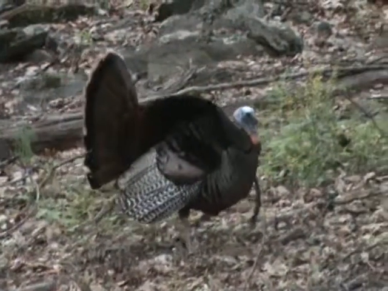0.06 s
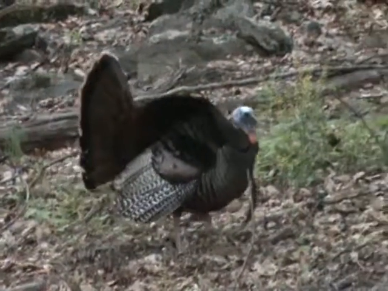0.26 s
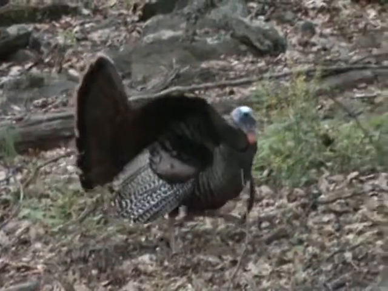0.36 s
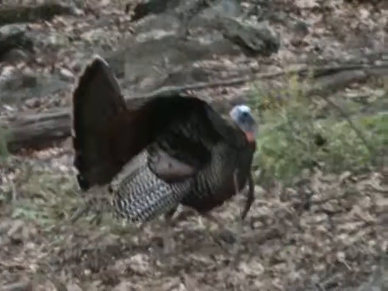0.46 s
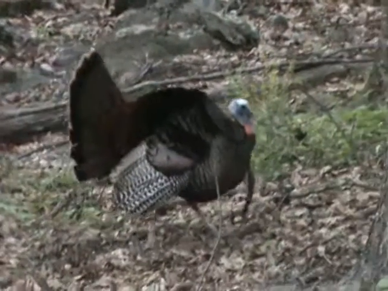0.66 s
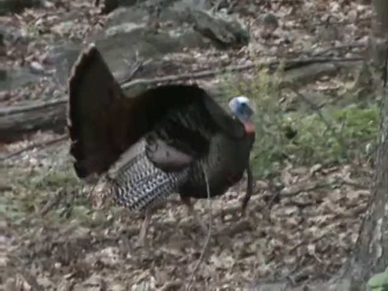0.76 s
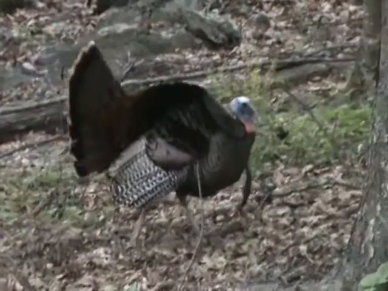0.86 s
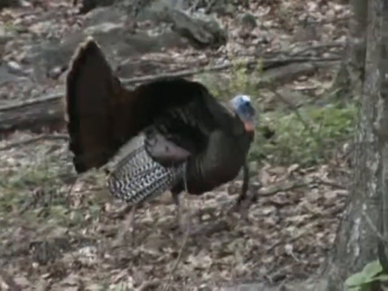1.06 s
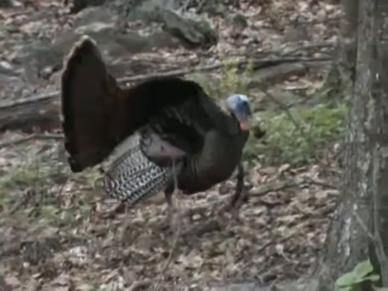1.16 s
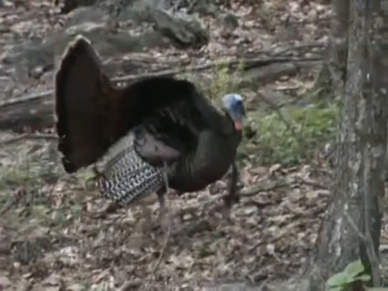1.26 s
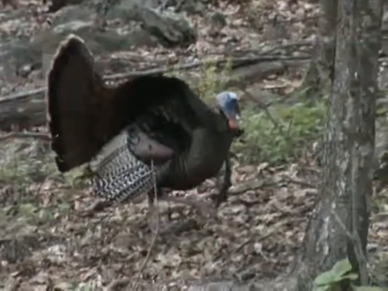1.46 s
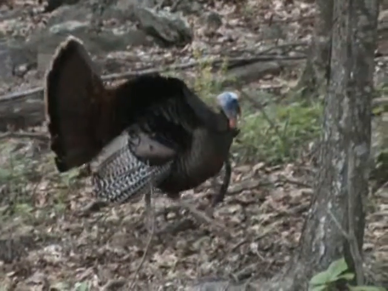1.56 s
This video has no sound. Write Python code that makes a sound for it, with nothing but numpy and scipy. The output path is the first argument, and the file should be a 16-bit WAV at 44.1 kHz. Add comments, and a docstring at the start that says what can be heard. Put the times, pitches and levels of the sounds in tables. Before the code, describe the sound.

Near the microphone, a wild turkey gobbles once, a brief hollow rattle that starts raspy and turns duller. Faint birds keep whistling far off among the trees, with soft leaf rustles, a few tiny stem snaps and steady hiss.

```python
"""A short, low, dry creaking rattle of uneven knocks sounds close by, a little to the left of the
microphone: its pulses ring hollow resonances, raspy at first, then duller and weaker.
Far off in the woodland, songbirds whistle and the trunks scatter their calls into a diffuse tail.
Dry leaves rustle faintly and a few stems snap. Under it all lie a steady rumble and hiss
and the thin, high whine of the electronics."""
import sys
import numpy as np
from scipy import signal
from scipy.fft import rfft, irfft
from scipy.io import wavfile
from scipy.ndimage import uniform_filter1d

SR = 44100
rng = np.random.default_rng(int(sys.argv[2]) if len(sys.argv) > 2 else 0)


def dump_mix(stems):
    """Bounce the given channels to the path in sys.argv[1] as a 16-bit WAV at rate SR."""
    frames = np.atleast_2d(stems).T  # one column per channel
    limited = np.clip(frames, -1, 1)  # hard clip at full scale
    pcm = np.round(limited * 32767).astype(np.int16)
    wavfile.write(sys.argv[1], SR, pcm)


N = 70560

# spectrum of dry leaves and stems: f/Hz, level/dB
LEAF_SPECTRUM = [(1500, -7.5), (3500, 0), (6500, 3.5), (9300, -1.5), (11000, -8.5), (16000, -18.5)]


def undb(db):
    """Decibels to gain."""
    return 10 ** (np.asarray(db) / 20)


def freqs():
    """Frequency of each spectrum bin."""
    return np.arange(N // 2 + 1) * SR / N


def gains(points):
    """Gain of each bin from points of f/Hz, level/dB."""
    hz, db = np.array(points, float).T
    return undb(np.interp(np.log(freqs() + 1), np.log(hz), db))


def noise(gain):
    """Coloured noise of rms 1."""
    x = irfft(rfft(rng.standard_normal(N)) * gain, N)
    return x / np.sqrt(np.mean(x ** 2))


def wide(gain, side_db):
    """Coloured noise spread between left and right."""
    return noise(gain) + undb(side_db) * noise(gain) * np.array([[1], [-1]])


def wander(rate_hz):
    """Smooth random motion of rms 1."""
    return noise(np.exp(-(freqs() / rate_hz) ** 2))


def background(t):
    """Low rumble and even hiss all around, with the thin whine of the electronics."""
    # spectrum of rumble and hiss: f/Hz, level/dB
    hiss_spectrum = [(20, -11.5), (55, 5.5), (90, -0.5), (160, -6.5), (300, -11.5), (700, -13.5),
                     (1500, -16), (2100, -14), (4000, -18.5), (7000, -19.5), (10500, -24.5), (15500, -24)]
    # stereo width: f/Hz, side over mid/dB
    hiss_width = [(30, -33), (120, -13.5), (400, 4), (1200, 6.5), (5000, -1.5), (9000, -2), (13000, -2),
                  (15500, -47)]
    # electronic tones: f/Hz, level/dB
    tones = [(12270, -77.5), (13274, -83), (14276, -88.5)]
    side = irfft(rfft(noise(gains(hiss_spectrum))) * gains(hiss_width), N)
    whine = sum(np.sqrt(2) * undb(db) * np.sin(2 * np.pi * (hz * t + rng.random())) for hz, db in tones)
    hiss = noise(gains(hiss_spectrum)) + side * np.array([[1], [-1]])
    return undb(-59.5) * hiss + whine


def whistle(t, curve, waver, flutter_db):
    """A bird's wavering pure tone along a curve of t/s, f/Hz, level/dB."""
    at, hz, db = np.array(curve).T
    pitch = uniform_filter1d(np.interp(t, at, hz), size=350) * (1 + waver * wander(120))
    gate = np.clip(np.minimum(t - at[0], at[-1] - t) / 0.0073 + 1, 0, 1)
    level = undb(np.interp(t, at, db) + flutter_db * wander(53))
    return np.sqrt(2) * gate * level * np.sin(2 * np.pi * np.cumsum(pitch) / SR)


def woods(t, call, t60_s=0.68):
    """Trunks scatter a call into a diffuse stereo tail."""
    tail = rng.standard_normal((2, N)) * undb(-60 * t / t60_s) * (1 - np.exp(-t / 0.015))
    tail = tail / np.sqrt(np.sum(tail ** 2, axis=1, keepdims=True))
    return signal.fftconvolve(call[None], tail, axes=1)[:, :N]


def songbirds(t):
    """Far, slurred whistles reach the microphone directly and by way of the trees."""
    # one curve per whistle: t/s, f/Hz, level before the paths/dB
    curves = [
        [(0, 5040, -76), (.012, 5280, -53), (.028, 5315, -64), (.046, 3830, -56), (.066, 3050, -58.5),
         (.081, 3217, -55), (.094, 4250, -61), (.11, 4540, -54.5), (.128, 4470, -64)],
        [(.16, 3780, -80), (.18, 3380, -53), (.198, 2950, -59.5), (.215, 2482, -67), (.228, 3277, -61),
         (.246, 2600, -67), (.27, 3840, -65.5), (.298, 3630, -55), (.32, 3610, -61), (.345, 3610, -66.5)],
        [(.405, 3844, -70.5), (.438, 3270, -73), (.46, 2906, -61.5), (.48, 2560, -75)],
        [(.56, 2555, -65), (.59, 2850, -65), (.6, 3050, -59), (.635, 3280, -68.5), (.72, 3263, -75),
         (.82, 3350, -82)],
        [(.925, 3650, -67), (.96, 3446, -64.5), (.995, 3196, -56), (1.018, 2720, -61.5), (1.048, 2270, -70),
         (1.1, 2282, -67.5), (1.138, 2740, -62), (1.25, 2610, -85)],
        [(1.405, 2906, -73), (1.43, 3050, -67), (1.455, 3304, -61), (1.52, 3270, -71.5), (1.6, 3200, -59)],
    ]
    # paths of each whistle: direct gain/dB, scattered gain/dB
    paths = [(-1, -4), (-0.5, -6.5), (-3.5, 3), (-1, 3.5), (-4, 2), (0, 6)]
    out = 0
    for curve, (direct_db, echo_db) in zip(curves, paths):
        song = whistle(t, curve, waver=.012, flutter_db=2.5)
        out = out + undb(direct_db) * song + undb(echo_db) * woods(t, song)
    return out


def chorus(t):
    """The farthest birds blur into two swelling bands of noise."""
    # bands of birdsong: f/Hz, width/Hz, level before the swell/dB
    bands = [(1322, 400, -68.5), (3100, 1200, -69.5)]
    # swell of the chorus: t/s, gain/dB
    swell = [(0, -16.5), (.25, 1.5), (.65, -3), (.9, -3), (1.1, 2.5), (1.6, -1)]
    out = 0
    for hz, width, db in bands:
        band = np.exp(-2 * ((freqs() - hz) / width) ** 2)
        out = out + undb(db + 0.42 * wander(15)) * wide(band, side_db=-11.5)
    return out * undb(np.interp(t, *np.array(swell).T))


def leaves(t):
    """Dry leaves rustle in soft swells of crisp grains over a low scuff."""
    # rustles: centre t/s, half length/s, crisp level before the grain/dB, scuff level/dB
    rustles = [(0.006, 0.079, -58, -64.5), (0.256, 0.074, -62.5, -59), (0.529, 0.028, -60, -75),
               (0.662, 0.059, -62, -100), (0.84, 0.088, -64, -61.5), (1.078, 0.058, -61.5, -67),
               (1.162, 0.024, -67.5, -65), (1.343, 0.12, -60, -67.5)]
    # spectrum of the scuff: f/Hz, level/dB
    scuff_spectrum = [(60, -7.5), (180, 5), (450, 0), (900, -1), (1800, -30), (4000, -29)]
    crisp, scuff = 0, 0
    for at, half, crisp_db, scuff_db in rustles:
        swell = np.exp(-.5 * ((t - at) / half) ** 2)
        crisp = crisp + swell * undb(crisp_db)
        scuff = scuff + swell * undb(scuff_db)
    grains = undb(2.5 * wander(400) - 3.5) * wide(gains(LEAF_SPECTRUM), side_db=-12)
    return crisp * grains + scuff * wide(gains(scuff_spectrum), side_db=-10.5)


def ring(modes, detune=.008):
    """Spectrum of damped resonances, slightly detuned on every pulse."""
    s, out = 2j * np.pi * freqs(), 0
    for hz, db, t60 in modes:
        omega = 2 * np.pi * hz * (1 + detune * rng.standard_normal())
        damping = np.log(1000) / t60
        out = out + undb(db) * SR * s / ((s + damping) ** 2 + omega ** 2)
    return out


def low_rattle(t):
    """Close by, each pulse builds with a brief rasp, then snaps and rings the hollow resonances."""
    # pulses, levels relative: t/s, level/dB, low ring/dB, bright ring/dB, rasp/dB
    pulses = [ (0.2373, -6.5, -4, -3, -6), (0.2401, -7.5, -5.5, 1, 5), (.2438, -4, 1.5, 6, -1.5),
              (.2454, -13, 10.5, -2, -20), (0.2673, -11, 0.5, 11, 5.5), (.2702, -17, -11, -17, -11),
              (0.2749, -10, 11, 13, -9), (0.2879, -17, 7.5, -2, -32), (.2999, -7, -1.5, 15.5, -29),
              (.3021, -5.5, -17, 18.5, -3), (0.3116, 0.5, 2, 3, -29), (.3245, -12.5, -24, -6, -16),
              (0.3301, -7.5, -0.5, 19, -1.5), (.3344, -4.5, 3, -6, -13), (.3448, -6.5, -9, 11, -33),
              (0.3518, -7, -1.5, -2, -1), (0.3632, -10, 3.5, -9, -59), (.371, -6.5, -1.5, -9, -3),
              (.3833, -17.5, 8.5, -6, -30), (0.3884, -7, 1.5, -1, -21), (.3999, -4, -0.5, -1, -14),
              (0.4034, -6, 0.5, 8, -17), (0.4103, -16, 0, 11, 11), (.4228, -14, -12, 3, -3),
              (0.4318, -1.5, -6, -1, -5), (0.4438, -3, -0.5, -20, -21), (0.4612, -10.5, 3, -4, -4),
              (.4722, -21, 8.5, -9, -26), (0.4851, -9, 1.5, -4, -10), (.5014, -17, -5, -7, -18),
              (0.5142, -13.5, 0, -9, 0)]
    # three groups of resonances: f/Hz, relative level/dB, t60/s
    low_modes = [(252, -16, 0.011), (399, -10, 0.019), (487, -3.5, 0.02), (664, -9.5, .016)]
    mid_modes = [(912, -2, 0.032), (942, -13.5, 0.033), (1300, -12, 0.037)]
    bright_modes = [(1596, -21, 0.012), (1982, -17, 0.031), (2366, -8.5, 0.015)]
    # colour of the rattle: f/Hz, gain/dB
    colour = [(70, 1.5), (200, 2), (680, 4), (765, -0.5), (860, 6.5), (1000, -1.5), (1200, -7), (1900, 2.5),
              (2550, -5.5), (2950, -19), (4500, -10)]
    # balance at the microphone: f/Hz, left over right/dB
    balance = [(140, 1), (400, 2.8), (700, 2.5), (1300, 5), (2400, 9)]
    rasp_s, rasp_lead_s, left_lag_s = .0015, .0023, .00016
    f, out = freqs(), 0
    for at, db, low_db, bright_db, rasp_db in pulses:
        rasp = rng.standard_normal(N) * np.exp(-((t - at + rasp_lead_s) / rasp_s) ** 2)
        snap = np.exp(-2j * np.pi * f * at)
        width_s = .00007 + .00048 * (at - pulses[0][0])  # later pulses are rounder, so duller
        push = (undb(rasp_db - 18) * rfft(rasp) - snap) * np.exp(-2 * (np.pi * f * width_s) ** 2)
        hollow = undb(low_db) * ring(low_modes) + ring(mid_modes) + undb(bright_db) * ring(bright_modes)
        out = out + undb(db) * push * hollow
    out = undb(-28.5) * out * gains(colour)
    pan = np.sqrt(gains(balance)) * np.exp(-1j * np.pi * f * left_lag_s)
    return irfft(np.array([out * pan, out / pan]), N)


def low_bird(t):
    """A lower bird, far among the trees, whistles notes that rise and fall in an arch."""
    # arched notes: t/s, length/s, top f/Hz, top level/dB
    notes = [(.445, .085, 1425, -65), (.715, .09, 1419, -65.5), (1.098, 0.09, 1565, -62),
             (1.37, 0.099, 1610, -65)]
    u = np.linspace(-1, 1, 9)  # from the start of a note to its end
    song = 0
    for at, length, hz, db in notes:
        arch = np.c_[at + length * (u + 1) / 2, hz * (1 - 0.2 * u ** 2), db - 3 * u ** 2]
        song = song + whistle(t, arch, waver=0.0298, flutter_db=3)
    return song + undb(1.5) * woods(t, song)


def stems(t, decay_s=.003):
    """Dry stems snap softly, each a tick of noise."""
    # snaps: t/s, level/dB
    snaps = [(1.167, -56), (1.342, -61), (1.448, -58)]
    envelope = sum(undb(db) * (t >= at) * np.exp(-np.abs(t - at) / decay_s) for at, db in snaps)
    return envelope * wide(gains(LEAF_SPECTRUM), side_db=-6)


def scene():
    """The close rattle, the woodland behind it."""
    t = np.arange(N) / SR
    return low_rattle(t) + songbirds(t) + low_bird(t) + chorus(t) + leaves(t) + stems(t) + background(t)


def record(dry):
    """The recorder cuts the top treble steeply."""
    top_hz = 15800
    return signal.sosfilt(signal.ellip(10, .1, 70, top_hz, fs=SR, output="sos"), dry)


dry = scene()
out = record(dry)
dump_mix(out)
```